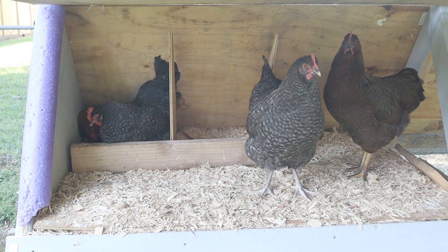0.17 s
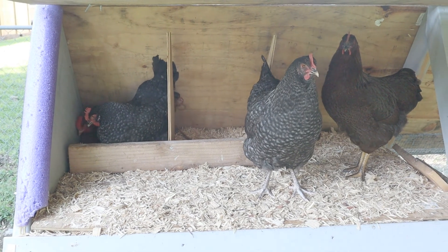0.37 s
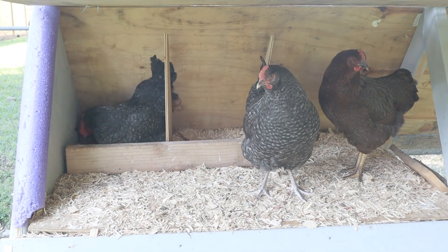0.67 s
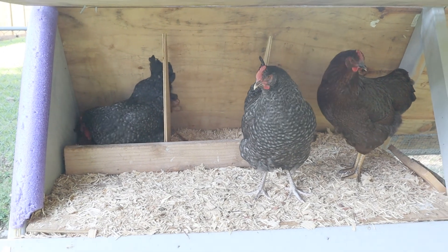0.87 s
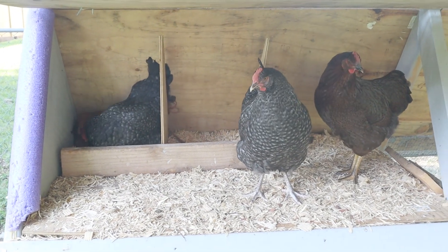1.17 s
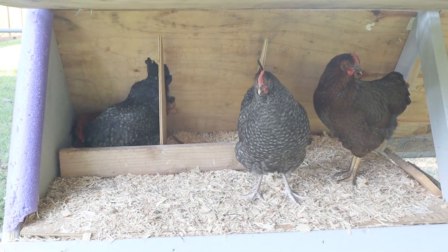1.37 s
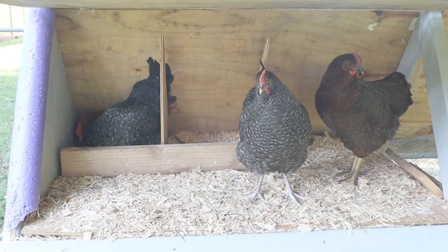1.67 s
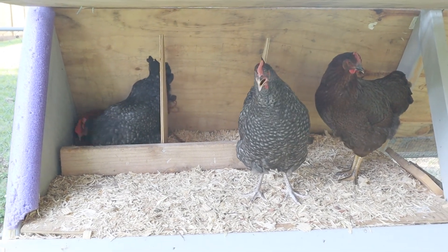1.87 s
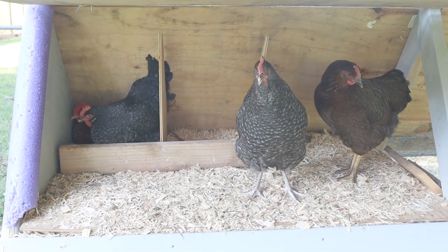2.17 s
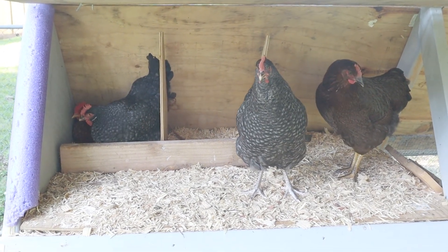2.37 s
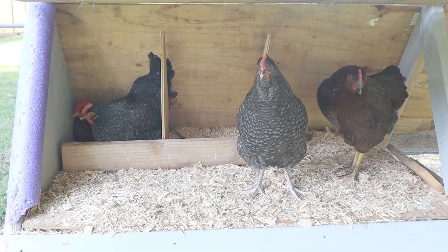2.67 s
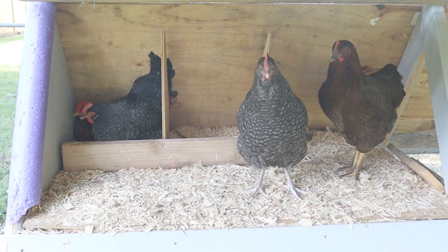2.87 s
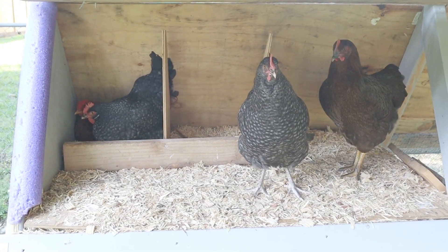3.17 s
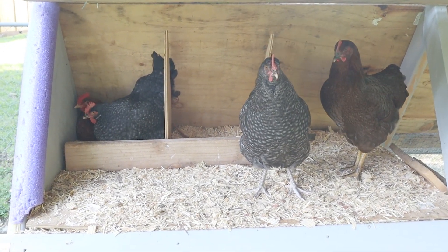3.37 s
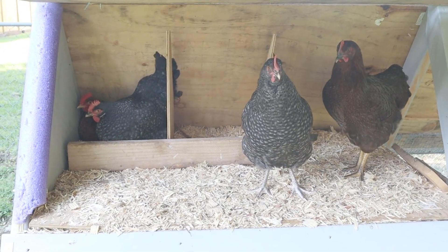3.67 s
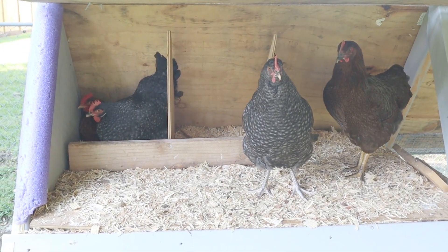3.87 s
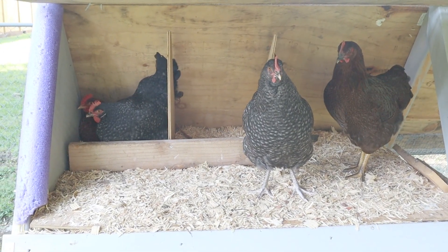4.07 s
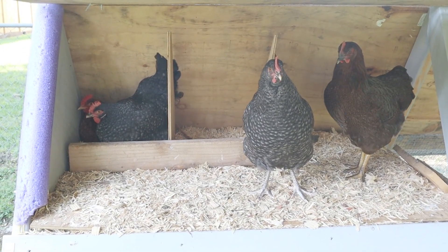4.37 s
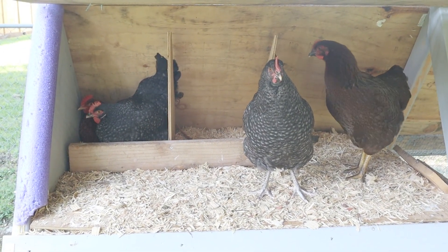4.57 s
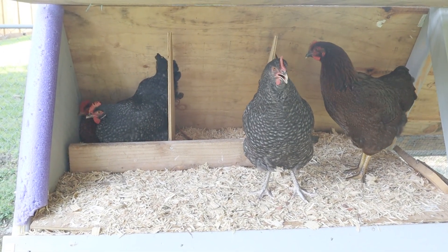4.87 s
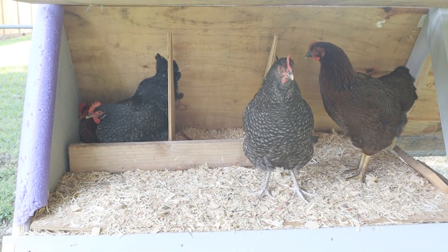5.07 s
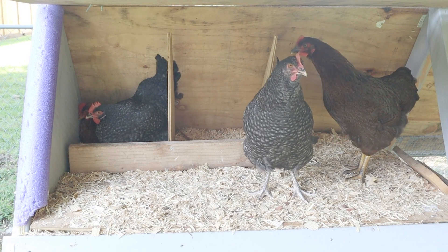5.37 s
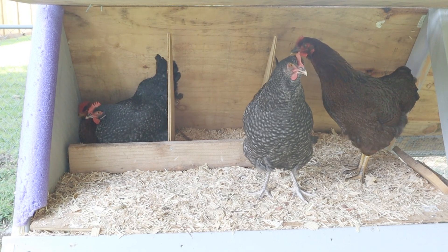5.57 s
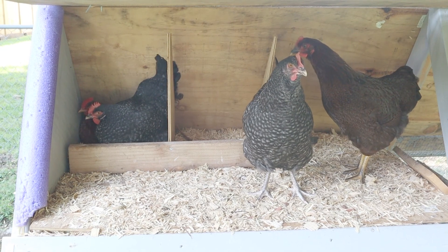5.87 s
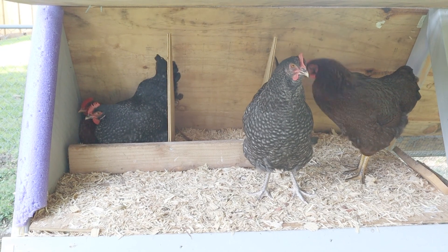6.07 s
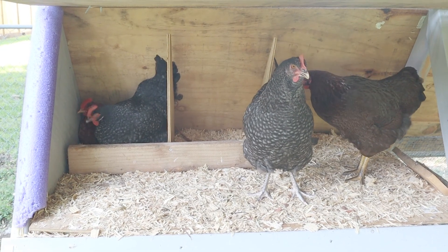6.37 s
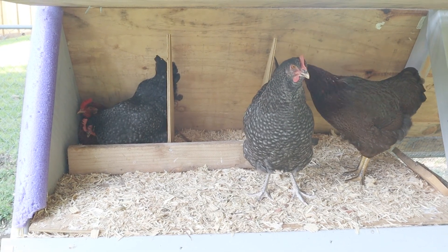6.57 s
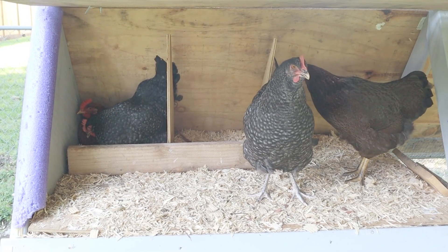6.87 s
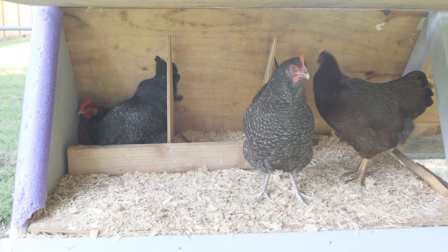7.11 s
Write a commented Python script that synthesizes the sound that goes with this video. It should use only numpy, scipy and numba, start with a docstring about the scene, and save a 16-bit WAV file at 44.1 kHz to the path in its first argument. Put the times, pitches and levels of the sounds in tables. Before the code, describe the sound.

Close to a small wooden chicken coop, over faint yard rumble, insect hiss and a low motor hum. From 0 to 0.75 s a near hen gives four low, throaty clucks about a quarter second apart, between soft wavering coos from another hen. About a second of near quiet follows. At 1.7 s a stronger cluck tips into a loud hoarse squawk at 1.8 s and a shorter, brighter one at 2.1 s, then two higher clucks at 2.4 and 2.6 s. A light wooden tap falls at 2.75 s. From 2.9 to 4.5 s flock mates mutter quietly, with barely audible distant bird calls at 3.1 and 3.9 s and beak taps from 4.2 s, hardest near 4.75 s. Clucks at 4.65 and 4.85 s launch a second long-short squawk, 4.95 to 5.4 s. Brisk, even, brighter clucks then repeat every quarter second to the end.

```python
"""Hen squawking in a wooden coop

A hen clucks in runs and breaks twice into a loud double squawk: membrane pulses and air puffs ring
throat and beak resonances. Flock mates mutter with the same voice and coo in wavering sine tones.
Beak taps ring single board modes; a far bird calls in fluttering harmonics. Outside, shaped noise gives
rumble and insect hiss over a motor hum of sines. Coop reflections and a yard echo follow the near sounds."""
import sys
import numpy as np
from scipy import signal
from scipy.fft import rfft, irfft
from scipy.io import wavfile
from scipy.ndimage import uniform_filter1d
from numba import njit

SR = 44100
rng = np.random.default_rng(int(sys.argv[2]) if len(sys.argv) > 2 else 0)


def master_out(mix):
    """Clip the mix to full scale and print it as 16-bit PCM to the path in sys.argv[1]."""
    frames = np.transpose(np.atleast_2d(mix))
    ceiling = np.clip(frames, -1, 1)
    pcm = np.round(ceiling * 32767).astype(np.int16)
    wavfile.write(sys.argv[1], SR, pcm)


def nominal_scale(level):
    """Amplitude ratio for a level in decibels (scalar or array-like)."""
    x = np.asarray(level, float) / 20
    return 10 ** x


N = 319284


def level(x, db):
    """Scale to an rms level in dB."""
    return x * nominal_scale(db) / np.sqrt(np.mean(x ** 2))


def walk(rate_hz):
    """Random levels held 1 / rate_hz s and slewed twice; spread near 1."""
    hold = int(SR / rate_hz)
    steps = np.repeat(rng.standard_normal(N // hold + 1), hold)
    return 1.4 * uniform_filter1d(uniform_filter1d(steps, hold), hold)[:N]


def add(out, x, start_s):
    """Mix x into out from start_s, cropping what falls outside."""
    i = int(round(start_s * SR))
    x = x[max(-i, 0):N - i]
    out[max(i, 0):max(i, 0) + len(x)] += x


@njit
def svf(x, hz, width):
    """State-variable band-pass with a moving centre, gain 1 there."""
    y, band, low = np.empty(len(x)), 0., 0.
    for i in range(len(x)):
        g, k = np.tan(np.pi * hz[i] / SR), width / hz[i]
        v = (band + g * (x[i] - low)) / (1 + g * (g + k))
        band, low, y[i] = 2 * v - band, low + 2 * g * v, k * v
    return y


def twice(x, hz, width_hz):
    """A resonance applied twice, for dark valleys beside it; each pass is widened to keep the width."""
    hz = hz + np.zeros(len(x))
    return svf(svf(x, hz, 1.54 * width_hz), hz, 1.54 * width_hz)


def yard():
    """Rumble and insect hiss in half-octave bands that flicker a little, over a wavering motor hum."""
    # Noise spectrum of the yard. Each row: frequency in Hz, relative density in dB per Hz.
    yard_colour = [(20, -15), (60, -0.5), (110, 0), (200, -8), (300, -16.5), (600, -20.5), (1100, -21),
                   (2100, -28), (3200, -23), (5900, -19), (7000, -25.5), (8200, -36.5), (16000, -40.5)]
    # Motor hum partials. Each row: frequency in Hz, mean level in dB rms.
    hum_partials = [(58.7, -84.5), (117.5, -65), (176.3, -64), (235, -65), (352.5, -78.5)]
    noise_db, flicker_db, flicker_hz = -52, 0.7, 3
    waver_db, waver_hz = 2, 4
    hz = np.maximum(np.fft.rfftfreq(N, 1 / SR), 1)
    colour_hz, colour_db = np.transpose(yard_colour)
    colour = nominal_scale(np.interp(np.log(hz), np.log(colour_hz), colour_db))
    spectrum = rfft(rng.standard_normal(N)) * colour
    noise = 0
    for step in range(8, 29):
        # triangular bands that overlap their neighbours
        share = np.clip(1 - np.abs(2 * np.log2(hz) - step), 0, 1)
        noise = noise + irfft(spectrum * share, N) * nominal_scale(flicker_db * walk(flicker_hz))
    t = np.arange(N) / SR
    hum = 0
    for partial_hz, db in hum_partials:
        gain = np.sqrt(2) * nominal_scale(db + waver_db * walk(waver_hz))
        hum = hum + gain * np.sin(2 * np.pi * partial_hz * t)
    return level(noise, noise_db) + hum


def tones(calls, overtones, first, waver):
    """Clear sung notes with a few overtones and soft ends; pitch and level waver a little."""
    waver_hz, waver_db = 45, 2.5
    out = np.zeros(N)
    sway = 1 + waver * walk(waver_hz)
    swell_db = waver_db * walk(waver_hz)
    for rows in calls:
        s, hz, db = np.transpose(rows)
        t = np.arange(s[0], s[-1], 1 / SR)
        i = (t * SR).astype(int)
        phase = 2 * np.pi * np.cumsum(np.interp(t, s, hz) * sway[i]) / SR
        note = first * np.sin(phase)
        note = note + sum(nominal_scale(gain_db) * np.sin(round(k) * phase) for k, gain_db in overtones)
        envelope = nominal_scale(np.interp(t, s, db) + swell_db[i]) * signal.windows.tukey(len(t), 0.15)
        add(out, np.sqrt(2) * note * envelope, s[0])
    return out


def far_bird():
    """Sinking calls that swell and fade; the air smears them into a fast random flutter."""
    # Far calls. Each row: start in s, length in s, start pitch in Hz, end pitch in Hz, level in dB.
    far_calls = [(3.08, .34, 782, 765, -66.5), (3.852, 0.31, 788, 750, -68)]
    # Overtones. Each row: multiple of the pitch, relative level in dB.
    far_overtones = [(2, -5.5), (3, -4), (4, 2), (5, -7)]
    edge_db, peak_share, flutter_hz = -8, 0.306, 160
    calls = [[(s, hz, db + edge_db),
              (s + peak_share * length, hz, db),
              (s + length, end_hz, db + edge_db)]
             for s, length, hz, end_hz, db in far_calls]
    return tones(calls, far_overtones, first=0.56, waver=0.004) * (1 + 0.6 * walk(flutter_hz))


def taps():
    """A beak's short push rings one board mode, with a brief noise at contact."""
    # Beak taps. Each row: start in s, drive level in dB, board struck.
    beak_taps = [(2.754, -36, "perch"), (4.18, -47, "wall"), (4.252, -36.5, "wall"), (4.395, -39, "wall"),
                 (4.737, -34.5, "wall"), (4.764, -26, "wall")]
    # Ring frequency in Hz of each board.
    board_hz = dict(wall=727, perch=1137)
    rise_s, contact_s, board_t60_s = 0.0034, 0.0015, 0.038
    out, t = np.zeros(N), np.arange(SR // 10) / SR
    for s, db, board in beak_taps:
        contact = 0.16 * rng.standard_normal(len(t)) * np.exp(-t / contact_s)
        ring = np.sin(2 * np.pi * board_hz[board] * t) + contact
        add(out, nominal_scale(db) * ring * np.minimum(t / rise_s, 1) * nominal_scale(-60 * t / board_t60_s), s)
    return out


def coos():
    """Each coo drops into its pitch while it swells, glides, and fades."""
    # Coos of a second hen. Each row: start in s, length in s, pitch in Hz, end pitch in Hz, level in dB.
    coo_calls = [(0.084, 0.099, 536, 581, -33.5), (0.271, 0.169, 615, 578, -36),
                 (0.539, 0.035, 508, 564, -34.5)]
    # Overtones. Each row: multiple of the pitch, relative level in dB.
    coo_overtones = [(2, -20), (3, -34)]
    scoop_ratio, scoop_s, attack_db = 1.38, 0.022, -11
    release_s, release_db = 0.031, -22
    calls = [[(s, scoop_ratio * hz, db + attack_db),
              (s + scoop_s, hz, db),
              (max(s + length - release_s, s + 1.9 * scoop_s), end_hz, db - 1),
              (s + length, end_hz, db + release_db)]
             for s, length, hz, end_hz, db in coo_calls]
    return tones(calls, coo_overtones, first=1, waver=0.012)


@njit
def syrinx(hz, weak, rough, chance, jitter, shimmer):
    """One pulse per closing of the membranes; every second one is weaker, rough ones wander in time and size."""
    pulses, phase = np.zeros(len(hz) + 1), np.empty(len(hz))
    p, k = 0.999, 0
    for i in range(len(hz)):
        step = hz[i] * np.exp(jitter * rough[i] * chance[k, 0]) / SR
        p += step
        if p >= 1:
            p, k = p - 1, k + 1
            size = np.exp(shimmer * rough[i] * chance[k, 1]) * (1 - weak[i] * (1 - k % 2))
            # split between two samples, for timing finer than a sample
            pulses[i] += size * p / step
            pulses[i + 1] += size * (1 - p / step)
        phase[i] = p
    return pulses[:-1], phase


def bank(x, modes):
    """Fixed resonances side by side, alternating in sign."""
    return sum((-1) ** k * nominal_scale(db) * twice(x, hz, width_hz) for k, (hz, width_hz, db) in enumerate(modes))


def voice(hz, weak, rough, db, throat_hz, mouth_db, beak_db, rasp_db, upper_db, neck_hz, neck_db, chest_hz, chest_db,
          upper_ratio, mouth_hz, beak_modes, rasp_modes, dip):
    """Pulses and puffs of air ring chest, throat, mouth, neck and beak; the tract rings out after the last pulse."""
    jitter, shimmer = 0.2, 0.3  # log spread per unit of roughness
    breath = 0.85  # air in the low resonances
    jet_share = 0.3  # decay of the treble hiss, in cycles
    rough_snap_db = 5  # treble scatter from pulse to pulse at roughness 1
    chest_width_hz, throat_width_hz, upper_width_hz = 300, 240, 330
    mouth_width_hz, neck_width_hz = 420, 240
    dip_ratio, dip_width_hz = 1.2, 800.0
    n, tail = len(hz), SR // 30
    weak, rough = np.clip(weak, 0, 1), np.clip(rough, 0, 1)
    pulses, phase = syrinx(hz, weak, rough, rng.standard_normal((n // 40, 2)), jitter, shimmer)
    puff = np.exp(-phase / 3.5) * rng.standard_normal(n)
    # fewer pulses a second must each be larger for the same loudness
    pulses = -pulses * np.sqrt(SR / hz / (1 - weak + weak ** 2 / 2))
    low = (pulses * (1 - 0.62 * rough) + breath * rough * puff) * nominal_scale(db)
    pulse_index = np.cumsum(np.diff(phase, prepend=1) < 0)
    snap_db = rough_snap_db * rough * rng.standard_normal(n // 40)[pulse_index]
    hiss = (0.75 + rough) * np.exp(-phase / jet_share) * puff
    high = nominal_scale(snap_db) * (pulses + hiss) * nominal_scale(db)
    low, high = np.pad(low, (0, tail)), np.pad(high, (0, tail))

    def hold(curve):
        """Hold the last value through the tail."""
        return np.pad(curve, (0, tail), mode="edge")

    throat_hz, neck_hz = hold(throat_hz), hold(neck_hz)
    upper, mouth, neck, beak, rasp = (nominal_scale(hold(c)) for c in (upper_db, mouth_db, neck_db, beak_db, rasp_db))
    body = twice(low, throat_hz, throat_width_hz)
    body = body - nominal_scale(chest_db) * twice(low, chest_hz, chest_width_hz)
    body = body - upper * twice(low, upper_ratio * throat_hz, upper_width_hz)
    body = body + mouth * twice(low, mouth_hz, mouth_width_hz)
    body = body + beak * bank(high, beak_modes)
    # the dip lies just above the neck resonance
    body = body - np.clip(dip, 0, 1) * svf(body, dip_ratio * neck_hz, dip_width_hz)
    body = body - neck * twice(low, neck_hz, neck_width_hz)
    return nominal_scale(16.5) * body + nominal_scale(6.5) * rasp * bank(high, rasp_modes)


def cluck(db, ms, hz, throat_hz, slack, rough_share, fade_db, dull_db):
    """The pulses speed up as the membranes tighten and the beak opens; loud clucks are brighter, soft ones chestier."""
    # One cluck. Each row: share of its length, level in dB (its start is scaled by slack below),
    # tension 0-1, roughness 0-1 before rough_share.
    cluck_shape = [(0, -12, 0, 0.42), (.15, 1.5, .4, 0.42), (0.33, 1.5, 0.77, 0.3), (.5, 0.5, 0.96, 0.18),
                   (.9, 1.5, 1, 0.21), (1.001, -11, .85, .4)]
    # The beak barely parts, so its treble rings in narrow bands.
    # Each row of both: centre in Hz, width in Hz, relative level in dB.
    narrow_beak = [(3498, 293, 2.5), (4530, 550, -9), (5000, 280, -12.5)]
    narrow_rasp = [(8020, 390, 6.5), (9110, 500, 1.5), (10320, 470, 4.5), (12800, 1800, -4)]
    share, *shape = np.transpose(cluck_shape)
    u = np.linspace(0, 1, int(ms * SR / 1000))
    shape_db, tension, rough = (np.interp(u, share, c) for c in shape)
    loose, flat = slack * (1 - tension), np.ones(len(u))
    # a slack start is quiet and closed
    effort_db = db + shape_db * np.where(u < 0.4, 0.33 + slack, 1) + fade_db * u
    closed_db = -60 * loose + dull_db
    return voice(
        hz * (1 - loose), weak=0.23 * flat, rough=rough * rough_share, db=effort_db,
        throat_hz=throat_hz * (1 - 0.029 * loose),
        mouth_db=-4.5 + 0.76 * db + closed_db,
        beak_db=-3 + 0.61 * db + 0.99 * closed_db,
        rasp_db=-11.5 + 0.79 * db + 1.3 * closed_db,
        upper_db=-12 + 26 * slack - 60 * loose,
        neck_hz=2750 * flat, neck_db=-16.5 + 0.296 * effort_db + dull_db,
        chest_hz=200, chest_db=-21.5 - 0.48 * db,
        upper_ratio=1.486, mouth_hz=1850, beak_modes=narrow_beak, rasp_modes=narrow_rasp, dip=0)


def mutters():
    """Closed-beak, dull clucks of the flock that start almost at full pulse rate and fade slightly."""
    # Each row: start in s, drive level in dB, driven length in ms, top pulse rate in Hz.
    mutter_calls = [(.573, -37, 24.2, 403), (2.707, -51.5, 8.8, 260), (2.904, -44, 17, 266),
                    (3.586, -43, 31, 178), (3.701, -43, 43, 306.5), (3.849, -40.5, 45.4, 334),
                    (4.063, -36.5, 39, 389.5), (4.21, -39.5, 30.4, 415), (4.355, -40.5, 21.7, 407),
                    (4.513, -43, 40, 443)]
    out = np.zeros(N)
    for s, db, ms, hz in mutter_calls:
        call = cluck(db, ms, hz, throat_hz=700, slack=0.12, rough_share=0.9, fade_db=-1, dull_db=-19)
        add(out, call, s)
    return out


def clucks():
    """Clucks of the near hen climb in pulse rate from a slack start."""
    # Each row: start in s, drive level in dB, driven length in ms, top pulse rate in Hz, top throat in Hz.
    cluck_calls = [(-.04, -32.5, 45.1, 177, 805), (.228, -31, 43, 176, 756), (.455, -30.5, 48, 187.4, 760),
                   (0.695, -31, 40.2, 180, 760), (1.727, -28, 52.7, 198.2, 785),
                   (2.366, -24, 44.3, 376.3, 636), (2.568, -25, 42.9, 350.5, 684),
                   (4.654, -32, 46, 190, 760), (4.850, -24, 53, 237.3, 744), (5.483, -25, 41.6, 364.8, 700),
                   (5.694, -23.5, 43.3, 348.3, 721), (5.943, -23, 45, 315, 749),
                   (6.191, -22.5, 50, 310.6, 770), (6.428, -22.5, 50.3, 306.8, 770),
                   (6.663, -22, 50.8, 319, 773), (6.919, -23, 50.4, 311, 772),
                   (7.147, -22.5, 47, 328.6, 756)]
    slack_hz, slack_share = 170.75, 0.8  # start rate; a low cluck starts at this share of its top rate
    out = np.zeros(N)
    for s, db, ms, hz, throat_hz in cluck_calls:
        slack = 1 - min(slack_hz / hz, slack_share)
        add(out, cluck(db, ms, hz, throat_hz, slack, rough_share=0.98, fade_db=0, dull_db=0), s)
    return out


def squawks():
    """Long forced calls that slip between registers; the wider the beak, the brighter."""
    # Two long-short pairs, one list per squawk. Each row: time in s, drive level in dB,
    # pulse rate in Hz, beak opening 0-1, register.
    squawk_calls = [
        [(1.817, -29.5, 417.4, 0.6, "husky"), (1.823, -14.5, 423.8, 0.47, "husky"),
         (1.838, -19, 508.4, 0.86, "hoarse"), (1.865, -18.5, 417.3, 0.52, "chaos"),
         (1.92, -19, 430, 0.42, "hoarse"), (1.95, -18, 486, 0.77, "hoarse"), (1.972, -21, 475.5, 0.89, "husky"),
         (1.992, -22.5, 452.3, 0.71, "clear"), (2.018, -21, 453.7, 0.2, "hoarse"),
         (2.051, -30, 354.6, .05, "creak"), (2.058, -40.5, 336, .05, "creak")],
        [(2.098, -34.5, 396, 0, "creak"), (2.118, -20, 409.3, 0.16, "creak"),
         (2.152, -25, 428.7, 0.08, "chaos"), (2.177, -18.5, 529, 0.9, "paired"),
         (2.203, -18, 543, 0.83, "paired"), (2.213, -15, 491.3, 0.96, "clear"),
         (2.238, -19.5, 482.8, 0.9, "clear"), (2.256, -25.5, 430, 0.1, "chaos"),
         (2.29, -36, 366.5, .25, "creak"), (2.295, -59, 357, 0.27, "creak")],
        [(4.94, -20, 433, 0.78, "husky"), (4.955, -16.5, 503.8, 0.84, "hoarse"),
         (5.0, -18.5, 488.1, 0.5, "chaos"), (5.04, -20, 419, 0.74, "chaos"), (5.065, -17, 491.6, 0.6, "hoarse"),
         (5.097, -18.5, 464.4, 0.74, "husky"), (5.122, -27.5, 437, 0.21, "chaos"),
         (5.155, -25, 382, 0.05, "creak"), (5.17, -90, 360.5, 0, "creak")],
        [(5.21, -35.5, 344.5, 0.49, "husky"), (5.23, -21, 374, 0.1, "husky"), (5.262, -23, 408.4, 0.3, "chaos"),
         (5.29, -17, 501, 0.7, "hoarse"), (5.305, -18.5, 493.5, 0.86, "clear"),
         (5.343, -15.5, 480.2, 0.81, "clear"), (5.37, -31.5, 403, 0, "chaos"), (5.392, -28, 372, 0.05, "creak"),
         (5.405, -72, 366, .2, "creak")],
    ]
    # Ways the membranes swing: strong-weak share 0-1, roughness 0-1.
    registers = dict(clear=(.05, .06), paired=(.6, .08), husky=(.2, .28), hoarse=(.55, .45),
                 chaos=(.5, .75), creak=(.75, .35))
    # Neck resonance, a row per squawk: start, middle and end in Hz, added level in dB, depth 0-1 of the dip.
    neck_paths = [(2880, 2530, 2120, 2, .95), (2200, 2200, 2150, -4, .7), (2650, 2250, 1950, -3, .95),
                  (2340, 2900, 2400, -6, .1)]
    # Throat resonance in Hz: beak shut, wide open.
    gape_throat_hz = (760, 810)
    # Rows for mouth, beak, rasp and neck: level in dB with the beak shut, level in dB wide open.
    gape_db = [(-38.5, -5), (-22.5, -8), (-35.5, -14), (-20.5, 1.5)]
    # Fixed resonances of the open beak. Each row of both: centre in Hz, width in Hz, relative level in dB.
    open_beak = [(3550, 420, 0), (4500, 700, -4)]
    open_rasp = [(6430, 1150, -7.5), (8530, 3580, 3.5), (12700, 1710, -27)]
    upper_per_dip_db = 4  # the stretched neck also strengthens the upper throat
    out = np.zeros(N)
    for rows, (*neck, stretch_db, dip) in zip(squawk_calls, neck_paths):
        s, db, hz, gape, register = zip(*rows)
        t = np.arange(s[0], s[-1], 1 / SR)
        weak, rough = (np.interp(t, s, c) for c in zip(*(registers[r] for r in register)))
        db, hz, gape = (np.interp(t, s, c) for c in (db, hz, gape))
        throat_hz, mouth_db, beak_db, rasp_db, neck_db = (
            shut + (wide - shut) * gape for shut, wide in [gape_throat_hz, *gape_db])
        neck_hz = np.interp(t, np.linspace(s[0], s[-1], len(neck)), neck)
        call = voice(
            hz, weak, rough, db, throat_hz, mouth_db, beak_db, rasp_db,
            upper_db=np.full(len(t), upper_per_dip_db * dip),
            neck_hz=neck_hz, neck_db=neck_db + stretch_db,
            chest_hz=410, chest_db=-10.5, upper_ratio=1.55, mouth_hz=1950,
            beak_modes=open_beak, rasp_modes=open_rasp, dip=dip)
        add(out, call, s[0])
    return out


def space(x):
    """Quick reflections off the boards, then a faint dull echo from the yard, as decaying noise responses."""
    coop_t60_s, coop_db = 0.07, -10
    yard_t60_s, yard_echo_db = 0.6, -39
    t = np.arange(SR // 2) / SR
    noise = rng.standard_normal((2, len(t)))
    coop = noise[0] * nominal_scale(-60 * t / coop_t60_s) * (t > 0.002)
    dull = svf(noise[1], np.full(len(t), 1500.0), 2400.0)
    echo = dull * nominal_scale(-60 * t / yard_t60_s) * (t > 0.02)
    response = nominal_scale(coop_db) * coop / np.linalg.norm(coop) + nominal_scale(yard_echo_db) * echo / np.linalg.norm(echo)
    return x + signal.fftconvolve(x, response)[:N]


def scene():
    """All birds and taps in the coop, over the far bird and the yard."""
    near = taps() + coos() + mutters() + clucks() + squawks()
    return (yard() + far_bird() + space(near))[None]


def top_cut(x):
    """Nothing passes above the cut-off."""
    return signal.sosfilt(signal.butter(12, 16500, fs=SR, output="sos"), x)


def record(dry):
    """The microphone rounds the loudest peaks."""
    mix = np.tanh(0.91 * dry) / 0.89
    return top_cut(mix)


dry = scene()
out = record(dry)
master_out(out)
```